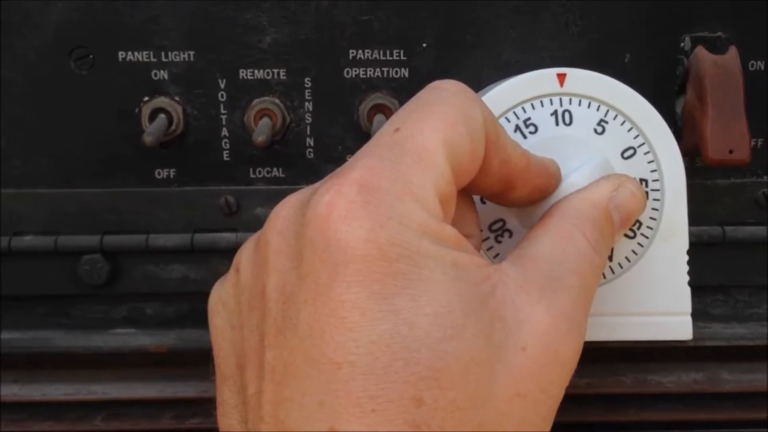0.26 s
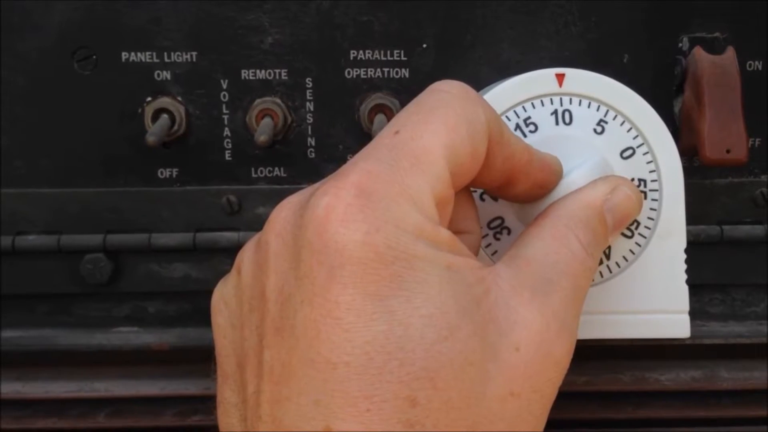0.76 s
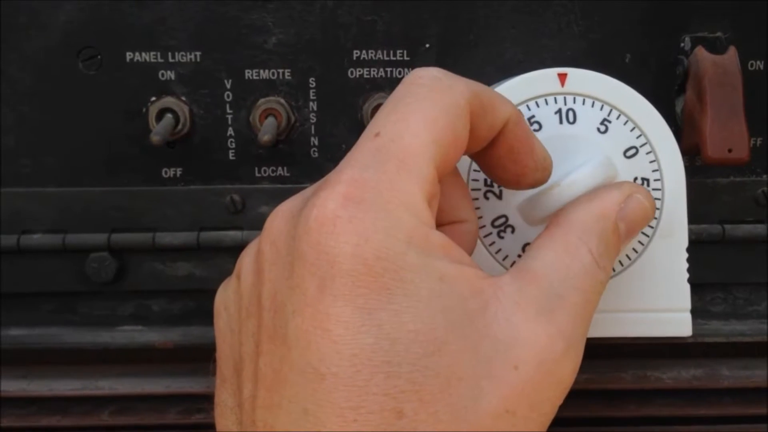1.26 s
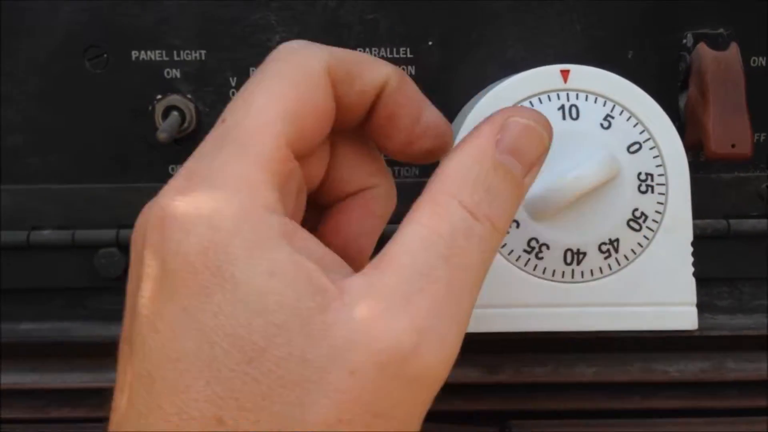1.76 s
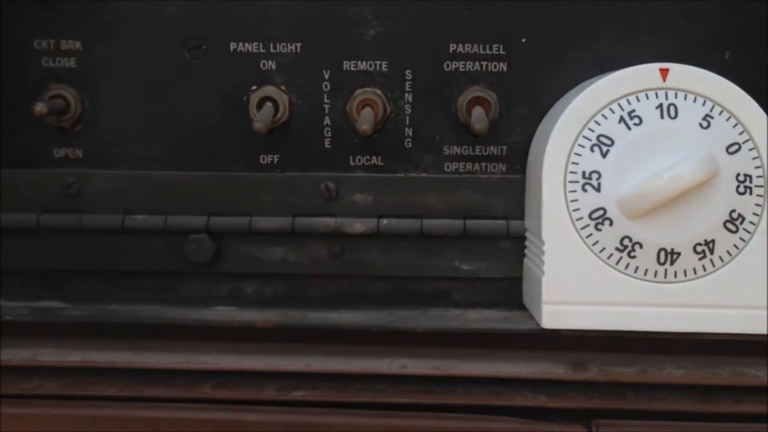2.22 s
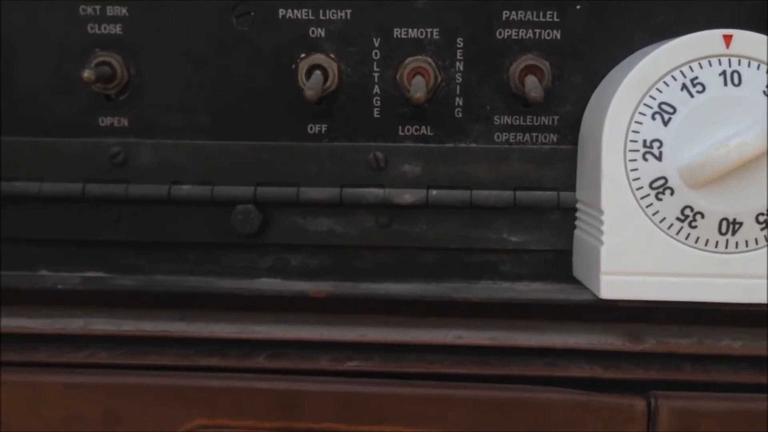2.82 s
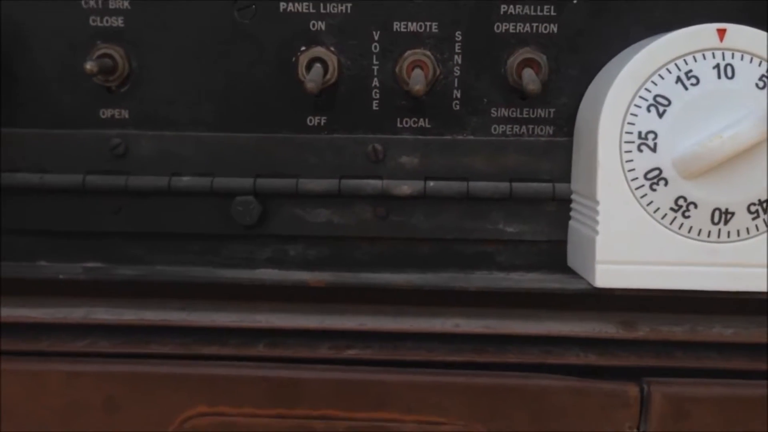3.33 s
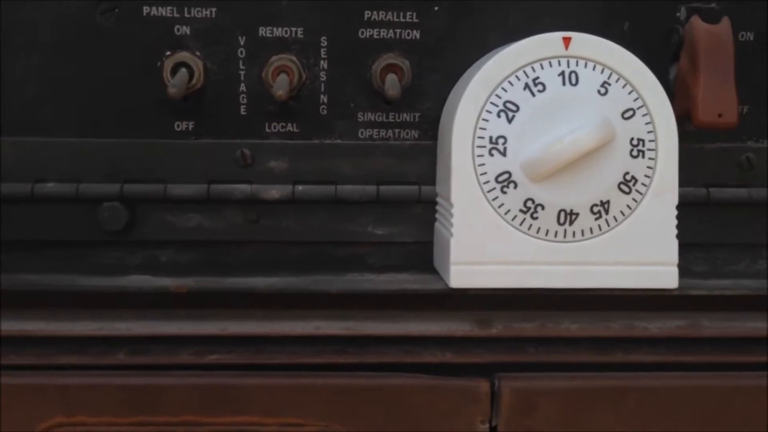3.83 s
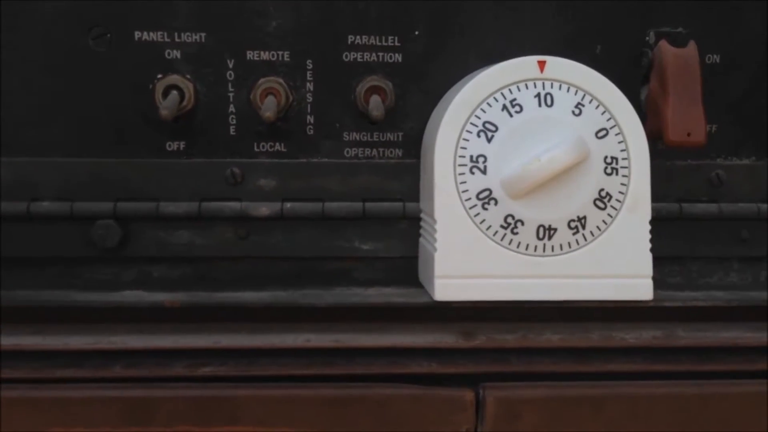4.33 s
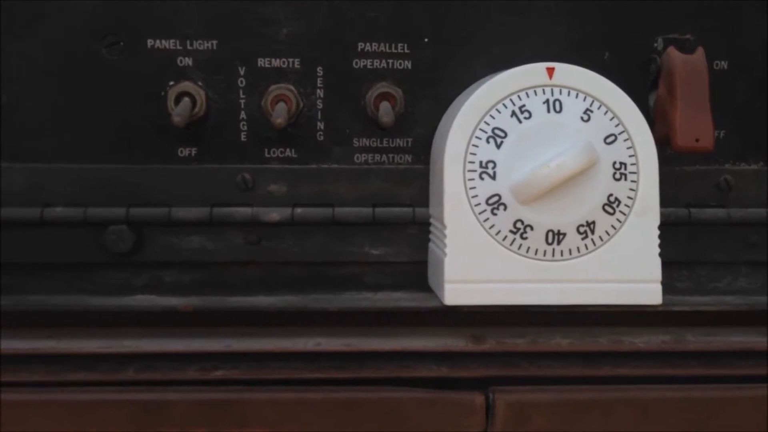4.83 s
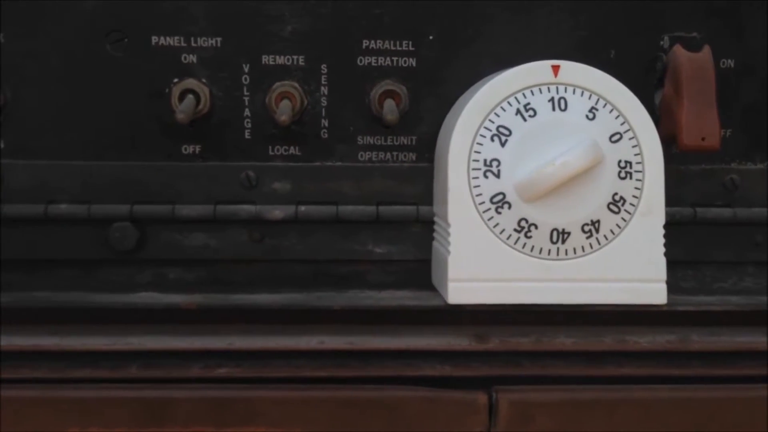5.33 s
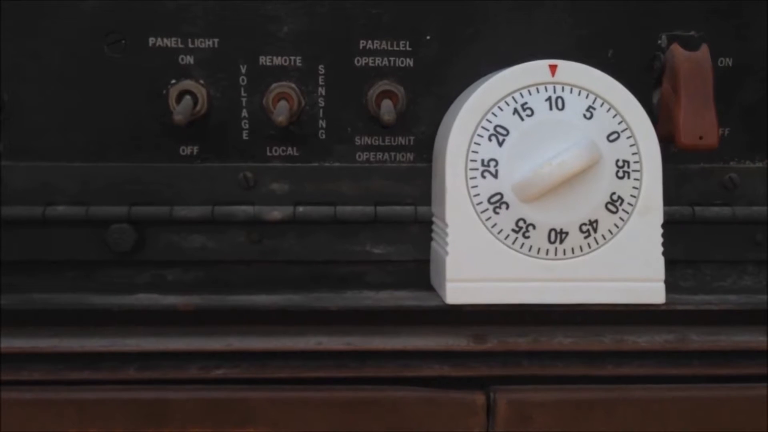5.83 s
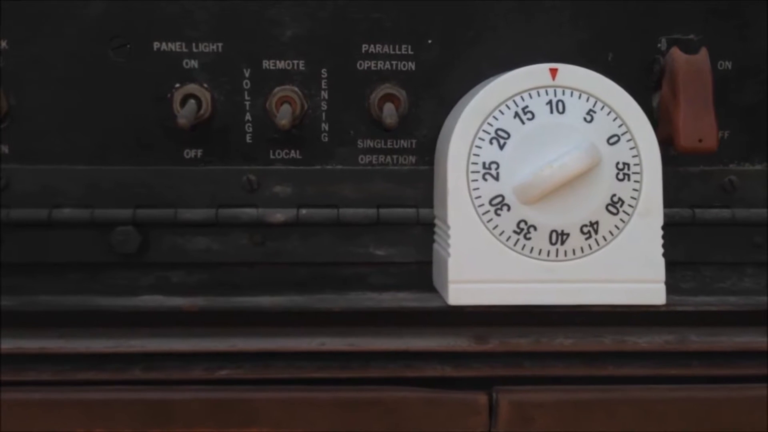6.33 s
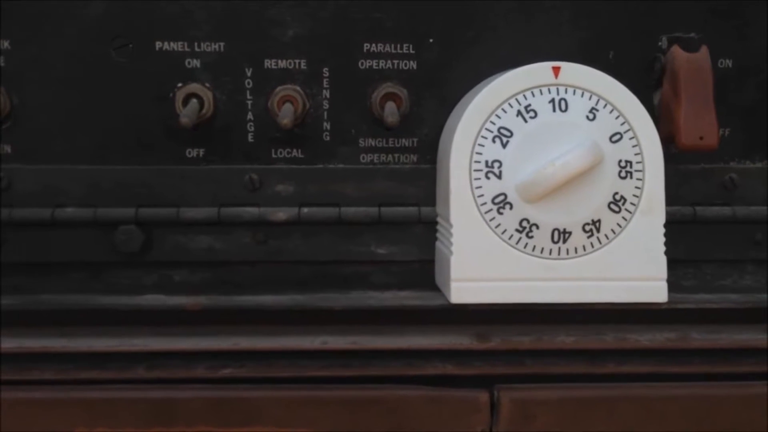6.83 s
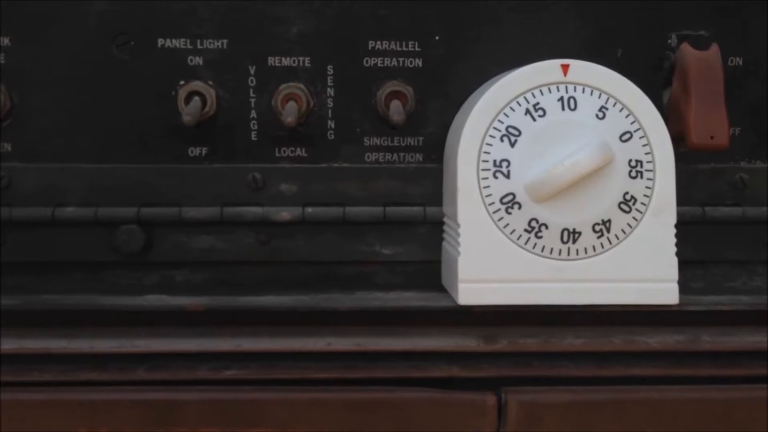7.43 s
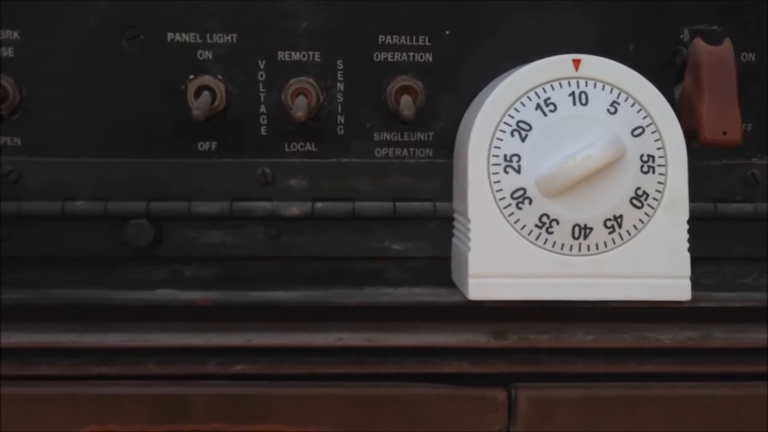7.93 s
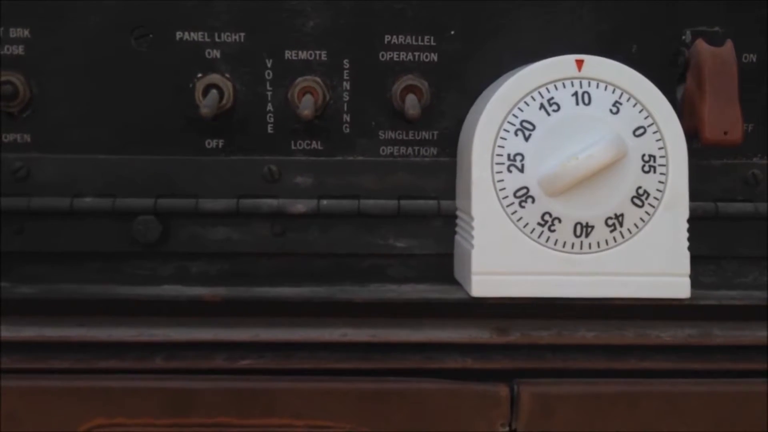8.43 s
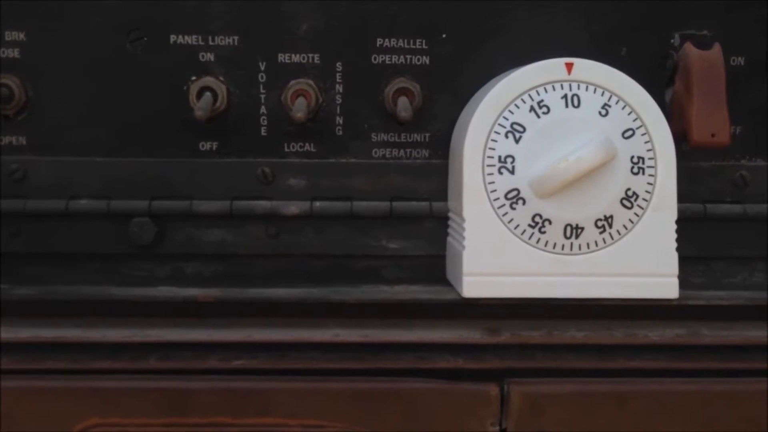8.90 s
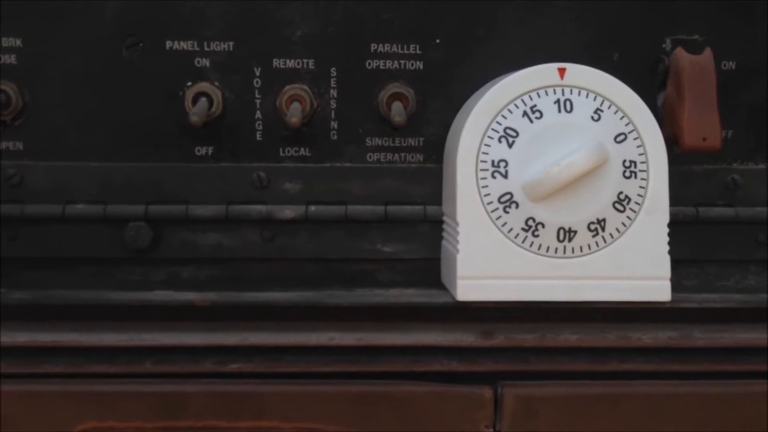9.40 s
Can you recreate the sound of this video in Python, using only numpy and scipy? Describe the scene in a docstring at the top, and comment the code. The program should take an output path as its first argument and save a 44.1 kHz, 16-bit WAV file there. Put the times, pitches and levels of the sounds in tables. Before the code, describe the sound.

Outdoors, close to a generator's control panel, a wind-up kitchen timer ticks faintly and quickly over a low rumble, with a few light finger taps. A relay snaps once. A few seconds later the starter slams in with a loud metal bang and grinds, and the big diesel engine catches with thuds and clacks. It races up, overshoots slightly and settles into a loud, steady drone with knocking and valve rattle.

```python
"""Kitchen timer and diesel generator start

Outdoors, a clockwork kitchen timer ticks on the control panel of a big diesel generator.
A relay snaps; later the starter slams into the flywheel and grinds the engine round.
The six cylinders catch, knock hard while racing up and overshoot, and the governor eases them
to a steady drone. One crank angle times the exhaust tones, the knock and the valve rattle."""
import sys
import numpy as np
from scipy import signal
from scipy.fft import rfft, irfft, next_fast_len
from scipy.io import wavfile
from scipy.ndimage import uniform_filter1d, minimum_filter1d, map_coordinates

SR = 44100
rng = np.random.default_rng(int(sys.argv[2]) if len(sys.argv) > 2 else 0)


def persist_wave(psi):
    """Save psi, clipped to +-1, as 16-bit WAV."""
    counts = np.round(np.clip(psi, -1, 1) * 32767).astype(np.int16)
    wavfile.write(sys.argv[1], SR, np.atleast_2d(counts).T)


N = 426006
T = np.arange(N) / SR
CYLINDERS = 6
TURNING_S, SPIN_UP_S, EXHAUST_LAG_S = 5.82, 0.024, 0.21


def engine():
    """One crank angle, counted in engine cycles, drives the exhaust and the block."""
    firing_hz = speed() * (1 + .002 * wander(rate=25))
    cycles = np.cumsum(firing_hz * (T > CRANKING[0][0])) / SR / CYLINDERS
    tailpipe = exhaust(cycles, firing_hz) + catches()
    block = knock(cycles, firing_hz) + rattle(cycles, firing_hz) + sizzle(cycles)
    return tailpipe + block + clacks() + jingle()


# Engine turning on the starter: time_s, firing_hz
CRANKING = [(5.7, 3.67), (5.999, 13), (6.4, 20.5)]
RACE_HZ_PER_S, INERTIA_S = 44.7, .14
GOVERNED_HZ, OVERSHOOT_HZ, OVERSHOOT_AT_S, SETTLE_S = 61.54, 10.7, 7.65, .67

def speed():
    """Firing rate in Hz: cranked, racing, then governed; the flywheel rounds off the corners."""
    s, hz = np.transpose(CRANKING)
    racing = np.interp(T, s, hz) + RACE_HZ_PER_S * np.maximum(T - s[-1], 0)
    governed = GOVERNED_HZ + OVERSHOOT_HZ * np.exp((OVERSHOOT_AT_S - T) / SETTLE_S)
    return uniform_filter1d(np.minimum(racing, governed), int(INERTIA_S * SR))


# Fuel rack travel: time_s, opening (0 to 1)
FUEL_RACK = [(6.4, .25), (6.78, 0.67), (7.1, 0.77), (7.3, 1), (7.5, 0.89), (7.67, 0), (8.1, 0),
             (8.55, 0.21), (9.6, 0.32)]

def fuel(lag_s=0):
    """The rack opens wide for the start, shuts at the overshoot, then finds its running position."""
    return np.clip(np.interp(T - lag_s, *np.transpose(FUEL_RACK)), 0, 1)


def effort(firing_hz, base_db, fuel_db, octave_db, lag_s=0):
    """Gain of one engine layer: louder with more fuel and with each octave of speed."""
    db = base_db + fuel_db * fuel(lag_s) + octave_db * np.log2(firing_hz / GOVERNED_HZ)
    return amp(db) * ramp(TURNING_S, TURNING_S + SPIN_UP_S)


def firing(cycles, depth, cylinder_db, stumble_db=4):
    """Each firing jumps up and dies away; the cylinders differ, and stumble more while cold."""
    firings = CYLINDERS * cycles
    stroke = firings.astype(int)
    cold = np.interp(T, [7.3, 7.9], [1, .3])
    db = cylinder_db * np.array([1, -1, 0, -1, 1, 0])[stroke % CYLINDERS]
    db = db + stumble_db * cold * rng.uniform(-2.05, 1, stroke.max() + 1)[stroke]
    swell = 1 + depth * amp(db) * np.exp(-(firings % 1) / 0.08)
    return np.where(cycles > 0, swell / np.sqrt(np.mean(swell[-SR:] ** 2)), 1)


def crank_tone(cycles, order, flutter):
    """A tone at a multiple of the cycle rate, its level fluttering."""
    sine = np.sqrt(2) * np.sin(2 * np.pi * (order * cycles + rng.random()))
    return sine * (1 + flutter * wander(rate=22))


# Weaker exhaust tones: multiple of the cycle rate
WEAK_ORDERS = (10, 11, 13, 16, 19, 24, 36, 48)
# Their balance against the third firing harmonic: level_db
WEAK_DB = (-23, -13.5, -15.5, -15.5, -13.5, -19, -24.5, -30.5)
# EQ of the gas puffs: freq_hz, gain_db
PUFF_EQ = [(20, -11), (40, -11.5), (68, 4), (95, 4), (150, 1), (220, 1.5), (300, -3), (420, -13),
           (800, -49)]
DRONE_FROM_HZ, DRONE_FULL_HZ, DRONE_FUEL_DB = 45.5, 59, 3

def exhaust(cycles, firing_hz):
    """The pipe throbs at the firing rate and drones on its multiples, over rumbling puffs of gas."""
    throb = pipe(firing_hz) * crank_tone(cycles, order=6, flutter=0.44)
    throb *= ramp(TURNING_S, TURNING_S + SPIN_UP_S)
    second = crank_tone(cycles, order=12, flutter=0.24) * amp(DRONE_FUEL_DB * fuel(EXHAUST_LAG_S))
    third = crank_tone(cycles, order=18, flutter=0.068)
    weak = sum(amp(db) * crank_tone(cycles, k, flutter=0.47) for k, db in zip(WEAK_ORDERS, WEAK_DB))
    drone = pipe(2 * firing_hz) * second + pipe(3 * firing_hz) * (third + weak)
    drone *= np.interp(firing_hz, [DRONE_FROM_HZ, DRONE_FULL_HZ], [0, 1])
    puffs = colour(rng.standard_normal(N) * firing(cycles, depth=0.82, cylinder_db=-2.5), PUFF_EQ)
    puffs *= effort(firing_hz, base_db=-26, fuel_db=7.2, octave_db=1, lag_s=EXHAUST_LAG_S)
    return throb + drone + puffs


# Exhaust pipe resonances: centre_hz, width_hz, gain_db
PIPE_MODES = [(43, 6, -32), (70, 10, -26.5), (127.1, 13, -20), (141.3, 12.5, -21), (194.2, 56, -12)]

def pipe(hz):
    """Gain of the pipe: a tone blooms as it sweeps through each resonance."""
    return np.sqrt(sum((amp(db) * resonance(hz, f, width)) ** 2 for f, width, db in PIPE_MODES))


# Exhaust thuds: start_s, level_db, pitch_hz, width_octaves, t60_s
CATCH_THUDS = [(6.5, -22.5, 151, 0.13, 0.67), (6.66, -24, 163, 0.26, 0.39), (6.735, -22, 176, 0.45, 0.28),
               (6.8, -13.5, 151, 0.12, 0.37), (6.84, -14.5, 151.8, 0.14, 0.26),
               (6.975, -14.5, 150, 0.32, 0.2), (7.24, -5.5, 121.9, 0.11, 0.72), (7.53, -6, 136, .2, 0.26)]

def catches():
    """Heavy single firings thud in the pipe as the engine catches."""
    return narrow_rings(CATCH_THUDS, rise_s=0.0027)


# EQ of the knock: freq_hz, gain_db
KNOCK_EQ = [(150, -7.5), (290, 1.5), (380, -1.5), (480, 0.6), (560, -1.5), (650, -1.5), (900, -3.5),
            (1300, -3), (1700, -6.5), (2300, -11.5), (3500, -19.5), (7000, -57)]
# Steel housing resonances: centre_hz, width_hz, gain_db
PANEL_MODES = [(457.7, 30, 7.5), (1045, 77, 8), (1383, 14, 5.5), (1696, 100, 3.5), (2413, 70, 3),
               (5070, 56, -2.5)]
# Timing gear tones: multiple of the cycle rate
GEAR_ORDERS = (104, 156, 163)
# Their balance against the knock: level_db
GEAR_DB = (-11.5, -27, -14.5)

def knock(cycles, firing_hz):
    """Combustion knocks through the housing; the timing gears whine in near full speed."""
    hits = impacts(cycles, count=90, jitter_s=.00005, uneven_db=1.5)
    blows = rng.standard_normal(N) + 0.81 * housing(hits, t60=0.056, direct=0.79)
    body = colour(blows * firing(cycles, depth=0.55, cylinder_db=2.0), KNOCK_EQ, PANEL_MODES)
    gears = sum(amp(db) * crank_tone(cycles, k, flutter=0.33) for k, db in zip(GEAR_ORDERS, GEAR_DB))
    gears *= ramp(7.3, 7.78)
    return (body + gears) * effort(firing_hz, base_db=-27.5, fuel_db=9.02, octave_db=1.5)


# EQ of the valve rattle: freq_hz, gain_db
RATTLE_EQ = [(1050, -8.5), (2150, 1), (2900, 0), (4300, -2.5), (5300, -6), (6100, -11), (6850, -10.5),
             (8300, -18.5), (11200, -25), (15400, -39)]

def rattle(cycles, firing_hz):
    """The valves tap brightly through the same steel panels."""
    hits = impacts(cycles, count=60, jitter_s=.0002, uneven_db=2.0)
    taps = rng.standard_normal(N) + 0.53 * housing(hits, t60=0.052, direct=0.43)
    clatter = colour(taps * firing(cycles, depth=0.338, cylinder_db=0), RATTLE_EQ, PANEL_MODES)
    return clatter * effort(firing_hz, base_db=-35.5, fuel_db=5.5, octave_db=2.1)


def impacts(cycles, count, jitter_s, uneven_db):
    """Valves, injectors and pistons strike at the same crank angles each cycle, never quite alike."""
    angle, size = rng.random(count), rng.standard_normal(count)
    due_s = np.interp(np.arange(40)[:, None] + angle, cycles, T, right=-1)
    late, strength = rng.standard_normal((2,) + due_s.shape)
    at = np.round((due_s + jitter_s * late) * SR).astype(int)
    heard = (at > 0) & (at < N)
    train = np.bincount(at[heard], (size * amp(uneven_db * strength))[heard], N)
    return train / np.std(train[-SR:])


def housing(x, t60, direct, paths=3):
    """The steel enclosure smears each impact into a short dense ring, by one of a few paths."""
    t, path = T[:SR // 8], rng.integers(0, paths, N)
    tails = rng.standard_normal((paths, len(t))) * amp(-60 * t / t60)
    return direct * x + sum(signal.oaconvolve(x * (path == k), tail / np.linalg.norm(tail))[:N]
                            for k, tail in enumerate(tails))


# EQ of the sizzle: freq_hz, gain_db
SIZZLE_EQ = [(2500, -18), (5500, -5), (9000, -3), (15500, -15)]
# Flares of sizzle: start_s, hold_s, level_db
SIZZLE_BURSTS = [(6.565, 0.018, -43), (6.67, .28, -42), (7.43, 0.19, -54.5)]

def sizzle(cycles):
    """Fine bright grains flare while the engine catches and at the top of its rush."""
    grit = grains(per_s=2800, spread_db=3.0) * firing(cycles, depth=0.87, cylinder_db=-2.0)
    fizz = colour(housing(grit, t60=0.054, direct=0.76), SIZZLE_EQ)
    return fizz * bursts(SIZZLE_BURSTS, attack_s=0.018, t60=0.28)


# Loose metal hits: start_s, level_db
CLACK_HITS = [(6.296, -35), (6.509, -34), (6.572, -32), (6.691, -41), (6.759, -30.5), (6.804, -32),
              (6.892, -30), (6.967, -30), (6.99, -33), (7.452, -31), (7.497, -31.5), (7.552, -36),
              (7.63, -32)]
# EQ of a steel clack or contact snap: freq_hz, gain_db
SNAP_EQ = [(59, -46), (105, -14), (150, -11), (230, -19.5), (380, -12.5), (690, -25), (1150, -9.5),
           (2100, -2.5), (2450, -3), (3860, -8), (4660, -1), (5300, -2), (6260, -13), (6800, -2),
           (8050, -10), (13600, -13.5), (15100, -23)]

def clacks(t60=0.053):
    """Loose steel clacks as the engine shakes."""
    out, t = np.zeros(N), T[:4096]
    for s, db in CLACK_HITS:
        add(out, s, amp(db - 60 * t / t60) * colour(rng.standard_normal(len(t)), SNAP_EQ))
    return out


# EQ of the jingle: freq_hz, gain_db
JINGLE_EQ = [(6000, -23.5), (8000, -1.5), (8800, 1.5), (9600, -5.5), (11000, -9), (15000, -15)]
# Fits of jingling: start_s, hold_s, level_db
JINGLE_BURSTS = [(7.925, .02, -41), (8.015, .02, -43), (8.53, 0.11, -46)]

def jingle(steady_db=-53):
    """A small loose part jingles on the running engine, faintly and in louder fits."""
    tinkle = colour(housing(grains(per_s=370, spread_db=2.0), t60=0.021, direct=0.55), JINGLE_EQ)
    shaking = amp(steady_db) * ramp(OVERSHOOT_AT_S, OVERSHOOT_AT_S + SETTLE_S)
    return tinkle * np.hypot(shaking, bursts(JINGLE_BURSTS, attack_s=.012, t60=.2))


# EQ of the grinding teeth: freq_hz, gain_db
GRIND_EQ = [(900, -33), (1550, -4.5), (2050, -2), (2600, -3), (3400, -3.5), (4400, -11.5), (6700, -13),
            (15200, -38.5)]
# Ring gear resonances: centre_hz, width_hz, gain_db
RING_GEAR_MODES = [(2086, 71, 10.5), (2410, 38, 8), (2900, 75, 10), (3260, 100, 7), (4970, 120, 8)]
# Teeth taking up load: start_s, hold_s, level_db
GRIND_BURSTS = [(5.745, 0.05, -25.5), (6.054, 0.057, -22.5), (6.178, 0.016, -25), (6.255, 0.023, -30.5),
                (6.425, .05, -31.5), (6.55, 0.057, -30), (6.66, .14, -28)]
# Whine, swelling until the first cylinders take over: time_s, pitch_hz, level_db
STARTER_WHINE = [(5.89, 1025, -45), (5.97, 1080, -35), (6.03, 1095, -31), (6.085, 1045, -32),
                 (6.156, 1066, -26), (6.185, 1052, -32), (6.3, 1041, -50)]

def starter(scrape_db=-42.5, off_s=6.9):
    """Gear teeth scrape and whine, grinding hard under the load of the cold engine."""
    teeth = housing(grains(per_s=2400, spread_db=3.5), t60=0.08, direct=.9)
    grind = colour(teeth, GRIND_EQ, RING_GEAR_MODES)
    on_s = CRANKING[0][0]
    engaged = ramp(on_s, on_s + SPIN_UP_S) - ramp(off_s, off_s + SPIN_UP_S)
    grind *= np.hypot(amp(scrape_db) * engaged, bursts(GRIND_BURSTS, attack_s=0.025, t60=0.25))
    s, hz, db = np.transpose(STARTER_WHINE)
    pitch = np.interp(T, s, hz) * (1 + 0.015 * wander(rate=90))
    whine = unit(np.sin(2 * np.pi * np.cumsum(pitch) / SR) * (1 + 0.46 * wander(rate=95)))
    return grind + whine * fader(s, db)


# Pinion hits: start_s, level_db, decay_factor
SLAM_HITS = [(5.722, -34, 1.43), (5.744, -26.5, 3.4), (5.763, -24, 0.97), (5.778, -6, 0.83),
             (5.787, -16, 1.27)]
# EQ of a slam: freq_hz, gain_db
SLAM_EQ = [(32, -48), (48, -26), (68, -8), (105, -18), (245, -4), (320, -8), (410, -5), (540, -3),
           (680, -1.5), (810, -6), (1380, -5), (2000, -14), (3200, -13.5), (6500, -23.5), (15000, -37.5)]
# Its base decay by band: freq_hz, t60_s
SLAM_DECAY = [(70, 0.73), (260, 0.77), (600, 0.22), (2000, 0.13), (15000, 0.15)]

def pinion(rise_s=0.0013):
    """The starter pinion strikes the flywheel's ring gear and slams home."""
    out, t = np.zeros(N), T[:SR // 2]
    for s, db, stretch in SLAM_HITS:
        slam = struck_metal(SLAM_EQ, SLAM_DECAY, stretch, tail_db=-24.5, tail_t60=0.69)
        add(out, s, amp(db) * slam * (1 - np.exp(-t / rise_s)))
    return out


# Contact snaps: start_s, level_db, decay_factor
SNAP_HITS = [(3.2008, -17, 0.95), (3.2028, -19.5, 0.82), (5.71, -36, 1.8), (5.719, -30.5, 4)]
# Their base decay by band: freq_hz, t60_s
SNAP_DECAY = [(150, 0.46), (500, 0.2), (2000, 0.071), (6000, 0.035), (15000, 0.037)]
# Ring of the relay frame and spring: pitch_hz, level_db, t60_s
SPRING_MODES = [(1820, -45, 0.25), (3206, -42, 0.18), (5900, -45.5, 0.207)]

def relay():
    """Relay and solenoid contacts snap; the relay frame sings on after the first hit."""
    out, t = np.zeros(N), T[:SR // 2]
    for s, db, stretch in SNAP_HITS:
        add(out, s, amp(db) * struck_metal(SNAP_EQ, SNAP_DECAY, stretch, tail_db=-34.5, tail_t60=0.32))
    for hz, db, t60 in SPRING_MODES:
        add(out, SNAP_HITS[0][0], amp(db - 60 * t / t60) * np.sin(2 * np.pi * hz * t))
    return out


# EQ of a tick: freq_hz, gain_db
TICK_EQ = [(300, -17), (900, -4.5), (1700, -7), (2800, -6.5), (4000, -2.5), (5200, -4), (6800, -5),
           (8200, -9.5), (11000, -9.5), (13000, -10), (15000, 1.5)]
# Brass clockwork resonances: centre_hz, width_hz, gain_db
BRASS_MODES = [(2760, 180, 11), (3860, 190, 8), (4480, 280, 8.5), (5050, 270, 0), (8940, 340, 15),
               (9800, 250, 4), (11500, 650, 6)]
# Faster while the dial is wound, then free with a limp: start_s, tick_count, beat_s, limp_s
TICK_RUNS = [(.1958, 6, .2217, .0006), (1.5245, 19, .2268, .00735)]
# Level ride ahead of the trim, the ticks mostly growing fainter: time_s, level_db
TICK_RIDE = [(.6, -32), (.9, -37.5), (2.7, -37.5), (3.7, -40.3), (5.6, -38)]

def timer(trim_db=-7, scatter_db=1.1, drop_s=0.0042, drop_db=-10, slide_s=.003, slide_db=-11):
    """Each tick is a pallet sliding, unlocking and, a moment later, landing, inside a plastic case."""
    out, t = np.zeros(N), T[:4096] - slide_s
    after = np.maximum(t, 0)
    slide = amp(slide_db) * (t < 0)
    unlock = amp(-60 * after / .045) * (1 - np.exp(-after / .0007))
    landing = amp(drop_db - 60 * abs(t - drop_s) / 0.0073) * (t > drop_s)
    tail = amp(-20 - 60 * after / 0.29) * (t > 0)
    envelope = slide + unlock + landing + tail
    for start_s, count, beat_s, limp_s in TICK_RUNS:
        for k in range(count):
            s = start_s + k * beat_s + limp_s * (k % 2)
            db = np.interp(s, *np.transpose(TICK_RIDE)) + scatter_db * rng.standard_normal()
            tick = colour(rng.standard_normal(len(t)), TICK_EQ, BRASS_MODES) * envelope
            add(out, s - slide_s, amp(db + trim_db) * tick)
    return out


# Small taps: start_s, level_db, pitch_hz, width_octaves, t60_s
PANEL_TOUCHES = [(.302, -61, 3700, 0.206, .1), (.742, -54, 4086, 0.86, 0.081),
                 (1.07, -57, 950, 0.18, 0.115), (1.125, -60.5, 1050, 0.22, 0.18),
                 (1.161, -42, 1015, 0.19, 0.064), (1.163, -55, 2320, 0.53, 0.051),
                 (1.424, -56.5, 1900, 1, 0.065), (1.95, -56, 2100, 0.93, 0.095),
                 (2.04, -56, 1860, 1, 0.177), (2.571, -47.5, 1440, 0.19, 0.032),
                 (2.76, -62.5, 1360, 0.98, 0.49), (3.188, -38.5, 3860, 0.81, 0.069),
                 (3.81, -55, 1200, .7, .04), (4.06, -46.5, 188, 0.37, 0.08), (4.3, -56, 1150, 0.33, .045)]

def handling():
    """Fingers and the timer case touch the panel."""
    return narrow_rings(PANEL_TOUCHES, rise_s=0.00048)


# EQ of the outdoor bed: freq_hz, gain_db
AIR_EQ = [(12, -44.5), (20, -30.5), (42, -6), (103, -1), (194, -8), (295, -18), (557, -18), (606, -21),
          (799, -22.5), (3380, -31.5), (3990, -27), (6050, -30.5), (8680, -31), (10200, -31), (15100, -33)]

def air(bed_db=-57.5, hum_hz=186, hum_db=-66.5, gust_db=2.0):
    """Low outdoor rumble swells unevenly under a steady hiss, with a faint far hum that wavers."""
    pitch = hum_hz * (1 + 0.017 * wander(rate=10))
    hum = np.sin(2 * np.pi * np.cumsum(pitch) / SR) * (1 + 0.45 * wander(rate=12))
    bed = colour(rng.standard_normal(N), AIR_EQ)
    rumble = signal.sosfiltfilt(signal.butter(2, 200, fs=SR, output="sos"), bed)
    gusts = rumble * (amp(gust_db * wander(rate=16)) - 1)
    return amp(bed_db) * (bed + gusts) + amp(hum_db) * hum


def struck_metal(eq, decay, stretch, tail_db, tail_t60):
    """Dense modes, each band dying at its own speed, over a faint ring of the housing."""
    t = T[:SR // 2]
    bins, hz = rfft(colour(rng.standard_normal(len(t)), eq)), np.fft.rfftfreq(len(t), 1 / SR)
    centres, t60s = np.transpose(decay)
    out = 0
    for share, t60 in zip(np.eye(len(decay)), t60s):
        band = irfft(bins * log_curve(np.c_[centres, share], hz), len(t))
        out = out + band * (amp(-60 * t / (t60 * stretch)) + amp(tail_db - 60 * t / tail_t60))
    return out


def narrow_rings(rows, rise_s):
    """Short noise bursts, each ringing around its own pitch."""
    out, t = np.zeros(N), T[:SR // 2]
    octaves = np.log2(np.fft.rfftfreq(len(t), 1 / SR) + 1)
    for s, db, hz, width, t60 in rows:
        band = 1 / (1 + ((octaves - np.log2(hz)) / width) ** 4)
        ring = unit(irfft(rfft(rng.standard_normal(len(t))) * band))
        add(out, s, ring * amp(db - 60 * t / t60) * (1 - np.exp(-t / rise_s)))
    return out


def grains(per_s, spread_db):
    """A random train of tiny impacts, a few of them large."""
    sizes = rng.standard_normal(N) * amp(spread_db * np.minimum(rng.exponential(1, N), 4))
    return sizes * (rng.random(N) < per_s / SR)


def colour(x, eq, modes=()):
    """Applies a broad EQ with resonances on top; rms 1."""
    size = next_fast_len(len(x))
    hz = np.fft.rfftfreq(size, 1 / SR)
    db = log_curve(eq, hz) + sum(boost * resonance(hz, f, width) for f, width, boost in modes)
    return unit(irfft(rfft(x, size) * amp(db), size)[:len(x)])


def resonance(hz, centre_hz, width_hz):
    """Bell curve of height 1."""
    return 1 / (1 + (2 * (hz - centre_hz) / width_hz) ** 2)


def log_curve(points, hz):
    """Reads a table on a log-frequency axis."""
    f, value = np.transpose(points)
    return np.interp(np.log(hz + 1), np.log(f + 1), value)


def fader(times, db, fade_s=.05):
    """Gain curve through level points, fading to silence outside them."""
    outside = np.maximum(times[0] - T, 0) + np.maximum(T - times[-1], 0)
    return amp(np.interp(T, times, db)) * np.exp(-(outside / fade_s) ** 2)


def bursts(rows, attack_s, t60):
    """Gain curve of events that each rise, hold and die away."""
    return sum(ramp(s, s + attack_s) * amp(db - 60 * np.maximum(T - s - hold_s, 0) / t60)
               for s, hold_s, db in rows)


def ramp(start_s, full_s):
    """Rises from 0 to 1 between two times."""
    return np.clip((T - start_s) / max(full_s - start_s, 1 / SR), 0, 1)


def wander(rate):
    """Smooth random drift of rms near 1, changing about rate times a second."""
    knots = rng.standard_normal(4096)
    return map_coordinates(knots, [T[::64] * rate], order=3, mode="wrap").repeat(64)[:N]


def add(mix, s, sound):
    """Mixes a sound in at time s."""
    part = mix[round(s * SR):][:len(sound)]
    part += sound[:len(part)]


def amp(db):
    """Decibels to gain."""
    return 10 ** (np.asarray(db) / 20)


def unit(x):
    """Scales to rms 1."""
    return x / np.sqrt(np.mean(x ** 2) + 1e-20)


def scene():
    """Mono mix, close to the control panel."""
    return (air() + timer() + handling() + relay() + pinion() + starter() + engine())[None]


def record(dry):
    """A quick limiter holds the peaks at full scale; a steep low-pass trims the very top."""
    gain = uniform_filter1d(minimum_filter1d(1 / np.maximum(abs(dry), 1), size=201), size=201)
    lowpass = signal.firwin(511, cutoff=15400, window=("kaiser", 9), fs=SR)
    return signal.oaconvolve(dry * gain, lowpass[None], "same")


dry = scene()
out = record(dry)
persist_wave(out)
```